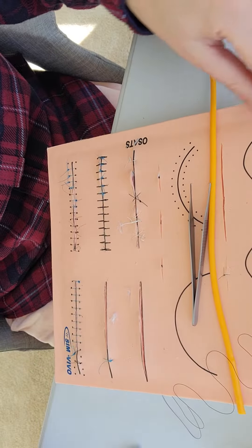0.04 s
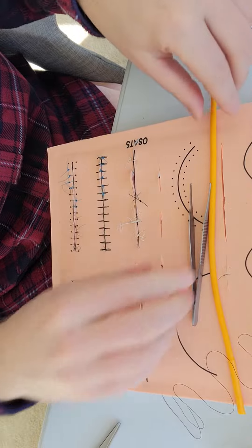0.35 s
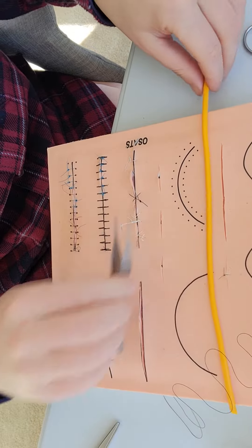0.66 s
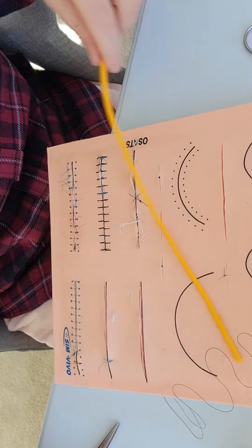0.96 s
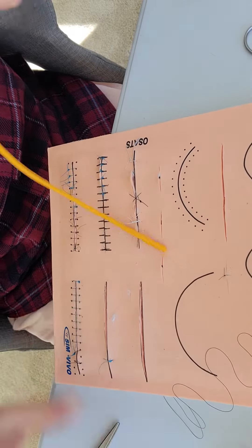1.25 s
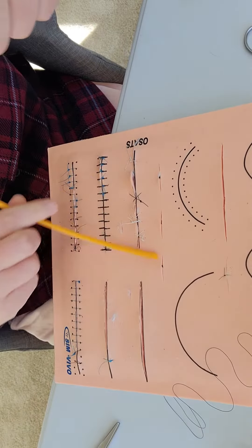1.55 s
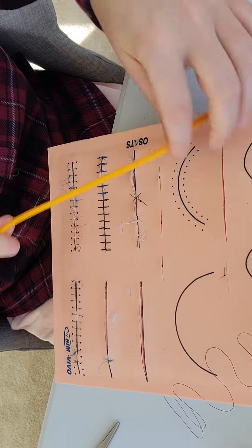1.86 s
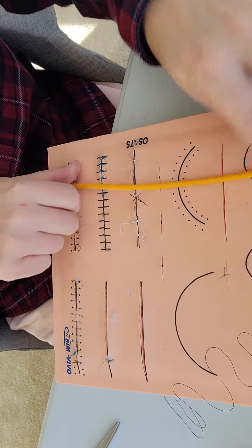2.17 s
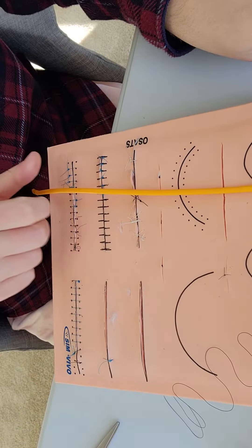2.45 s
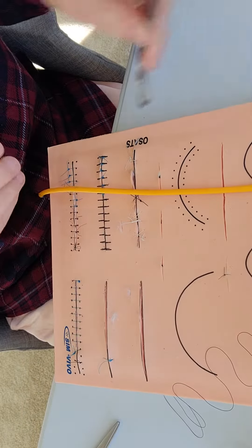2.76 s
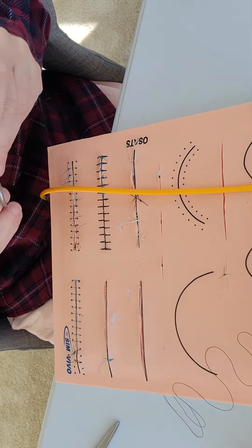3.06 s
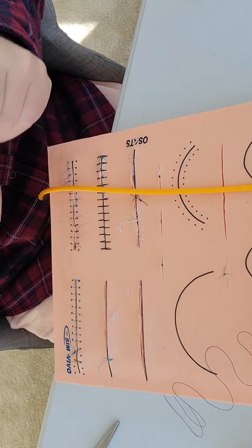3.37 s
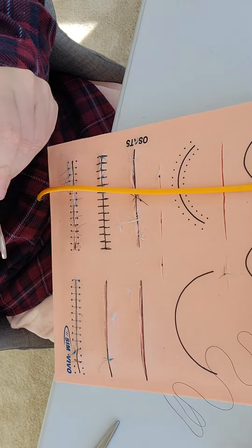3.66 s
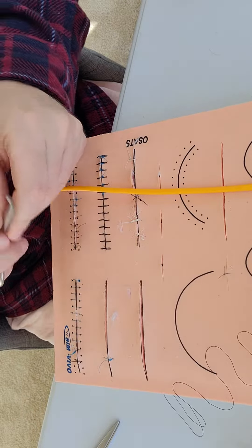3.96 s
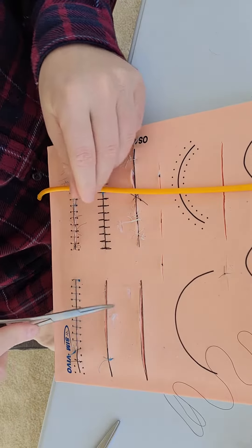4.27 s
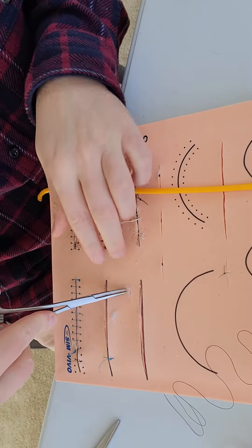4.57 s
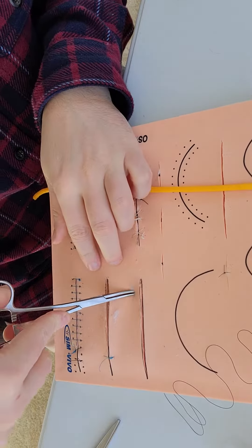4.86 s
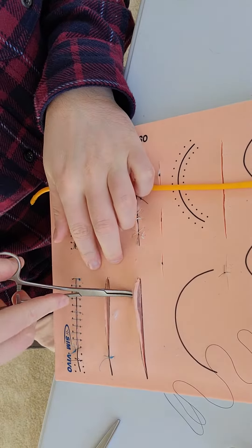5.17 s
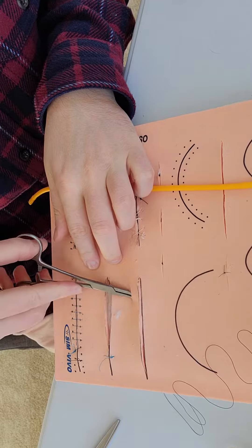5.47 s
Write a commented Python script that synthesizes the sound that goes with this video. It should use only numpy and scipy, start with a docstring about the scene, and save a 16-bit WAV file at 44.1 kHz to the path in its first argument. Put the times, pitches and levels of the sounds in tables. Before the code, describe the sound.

Steel instruments scrape and clatter on a plastic table, followed by faint metal ticks over quiet room noise.

```python
"""A small room, where steel suturing instruments are handled on a plastic folding table. Scissors slide and
clatter down, forceps leave the practice pad and drop, a needle holder is dragged and picked up. Each impact
excites the bending modes of the steel and of the table top; the harder the blow, the sharper its edge. Sliding
tools scrape by stick-slip friction. In between come soft bumps on the pad, a brushing sleeve and tiny ticks of
steel in the fingers, over quiet room noise."""
import sys
import numpy as np
from scipy import signal
from scipy.fft import rfft, irfft, next_fast_len
from scipy.io import wavfile

SR = 44100
rng = np.random.default_rng(int(sys.argv[2]) if len(sys.argv) > 2 else 0)


def store_pcm(level_fs):
    """Save levels as 16-bit WAV."""
    pcm = np.round(np.clip(level_fs, -1, 1) * 32767).astype(np.int16)
    wavfile.write(sys.argv[1], SR, np.atleast_2d(pcm).T)


N = 252252
RING_T = np.arange(SR * 3 // 5) / SR  # time axis of one contact, in seconds

# Impacts of steel on the table. Each row: start in seconds, instrument, clack level in dB,
# high bending boost in dB, knock level in dB, pitch of the struck spot in Hz.
BLOWS = [(-0.001, "scissors", -39, -2, -36.5, 330.4), (0.084, "scissors", -29, -2.5, -25.5, 937),
         (0.0969, "scissors", -38.5, -2, -44.5, 390), (0.1207, "scissors", -36, 10, -38, 690),
         (0.1286, "scissors", -51.5, 4, -30.5, 523), (1.04, "forceps", -40, -5, -31.5, 590),
         (1.0738, "forceps", -35, -4.5, -28.5, 483), (1.0761, "forceps", -38.5, 5.5, -32.5, 555),
         (1.2119, "forceps", -36, 2, -31.5, 481), (2.6206, "holder", -39, -4.5, -34.5, 503)]
# Character of each instrument. Each entry: low bending boost in dB, centre of the high bending in Hz,
# rattle in dB relative to the clack, thump in dB relative to a knock at 510 Hz.
INSTRUMENTS = {"scissors": (0, 5397.5, -1, -11), "forceps": (-11.5, 5049.5, -9.5, -22),
               "holder": (13, 4511, -1, -16)}
# Sliding strokes. Each row: start in seconds, length in seconds, steel level in dB,
# high bending boost in dB, table level in dB, slip rate in Hz.
DRAGS = [(-0.12, 0.43, -49.5, -1.5, -48, 200), (2.38, 0.081, -49, 3, -54, 948),
         (2.419, 0.049, -37.5, -3, -39.5, 741.8), (2.482, 0.08, -51.5, -4.5, -39.5, 383.4),
         (2.598, 0.052, -54, -5.5, -44, 401)]
# Hands and a rubber tube bump the pad. Each row: start in seconds, level in dB, pitch in Hz.
BUMPS = [(0.51, -64.5, 403), (0.584, -55.5, 600), (1.952, -59.5, 380), (2.164, -60, 620), (2.387, -61, 260)]
# Joints and finger rings touch in the hand. Each row: start in seconds, level in dB.
TICKS = [(0.4683, -70), (2.9229, -74), (3.4206, -81), (3.6109, -72), (3.6701, -74.5), (3.8492, -82),
         (4.2352, -60.5), (5.4965, -86)]

# Modes of free vibration. Each row: frequency in Hz, relative level in dB, 60 dB decay time in seconds.
STEEL_MODES = [(1986, -1, 0.077), (2194, -8.5, 0.076), (2756, 4.5, .13), (3060, 8, 0.16), (3510, 3, 0.15),
               (3920, -3.5, 0.2), (4450, -7.5, 0.11), (4715, -6.5, .1), (4940, -2.5, .12),
               (7480, -25, 0.148), (9250, -30.5, 0.2004)]  # instruments damped by table and fingers
TABLE_MODES = [(278.3, -8, 0.71), (319.4, -0.5, 0.29), (378.7, -3, .1), (550, 3, 0.13), (627, -5.5, 0.0692),
               (850, -10, 0.12), (915, -14, 0.098), (1129, 2, 0.1), (1309, -8.5, .09)]
HOLDER_MODES = [(5950, -2, 0.025), (7750, 0.5, 0.07), (8600, -18, .05), (15000, -22, 0.06)]  # needle holder in the hand
# Modes driven by noise. Each row: frequency in Hz, bandwidth in Hz, relative level in dB.
FORCEPS_MODES = [(1965, 70, -3), (2687, 70, -2), (3100, 70, -4.5), (3955, 94, -1), (4826, 65.3, -10.5),
                 (5400, 66, -5.5), (6250, 60, -8), (7490, 107.5, -10.5)]
DRONE_MODES = [(96, 13.61, -7.5), (139.5, 20, 2), (192, 7.9, -8), (228, 16.1, -8.5)]  # low modes of the room

# Spectra of contact pulses. Each row: frequency in Hz, relative spectral level in dB.
CLACK_SPECTRUM = [(300, -23), (1300, -3), (2100, -2), (2850, 6.5), (3500, 2), (4200, -2), (5000, -4.5),
                  (6000, -13), (7800, -20), (9500, -43.5), (16000, -62.5)]  # hard contact in the steel
EDGE_SPECTRUM = [(3000, -28), (7000, 6), (10000, -3.5), (12500, 1), (15500, -2.5)]  # its bright onset
KNOCK_SPECTRUM = [(80, -24), (200, -10.5), (290, 2), (500, -6), (700, -2.5), (900, -0.5), (1200, 1),
                  (1700, -8), (3000, -25.5), (8000, -62)]  # push on the table top
THUMP_SPECTRUM = [(25, -21.5), (70, -2.5), (130, 6.5), (270, -0.5), (450, -21.5), (1500, -50.5)]  # bass of a landing
TICK_SPECTRUM = [(500, 10.5), (1300, 10.5), (3000, -3.5), (4800, -1.5), (6300, 5.5), (7800, 1.5),
                 (10000, -23), (16000, -11)]  # light touch of steel on steel
SNAP_SPECTRUM = [(3000, -29.5), (7000, 4.5), (10000, -11), (13500, -14), (15000, 4.5), (15700, -4)]  # treble of a sharper touch
# Spectra of noises. Each row: frequency in Hz, relative spectral level in dB.
CLOTH_SPECTRUM = [(700, -24), (1300, -6.5), (2700, -0.5), (4000, 5.5), (6200, -2.5), (8200, -8.5),
                  (9200, -32.5), (15500, -25)]  # brushing sleeve
PAD_SPECTRUM = [(20, -4), (55, 3), (120, -2.5), (220, -19.5), (600, -22), (1500, -54.5)]  # hand's weight on the pad
AIR_SPECTRUM = [(20, -11.5), (58, -0.5), (78, -5.5), (98, 1.5), (170, -6), (300, -12.5), (500, -16),
                (850, -20), (1180, -16.5), (1700, -23), (2600, -32.5), (5000, -42), (7600, -44),
                (9200, -55.5), (13000, -46)]  # room noise

# Reverberation of the room. Each row: frequency in Hz, 60 dB decay time in seconds.
ROOM_DECAY = [(100, 0.43), (400, 0.25), (1200, 0.2), (3200, 0.28), (7000, 0.25), (14000, 0.061)]
# Where the hands work. Each row: time in seconds, lead of the left microphone in seconds.
HAND_PATH = [(0, -.0002), (1.3, -.00023), (2.3, .00022), (5.7, .00022)]


def blows(give_s=0.00057):
    """Impact: a landing instrument clacks and rattles, and the table top gives way a moment later."""
    out = np.zeros((2, N))
    for start, tool, clack_db, high_db, knock_db, spot_hz in BLOWS:
        low_db, high_hz, rattle_db, weight_db = INSTRUMENTS[tool]
        edge_db = -62.5 + 2.4 * (clack_db + 36)  # the edge grows faster than the clack
        edge_db += high_db - 0.4 * abs(low_db)  # and depends on how the steel bends
        thump_db = knock_db + weight_db - 17.5 * np.log2(spot_hz / 510)  # stiffer spots thump less
        clack = amp(clack_db) * steel_clack(low_db, high_db, high_hz, ring_db=-12)
        steel = clack + amp(rattle_db) * rattle(clack) + amp(edge_db) * click(EDGE_SPECTRUM)
        knock = amp(knock_db) * table_knock(spot_hz, q=5.7, ring_db=-6.5)
        thump = amp(thump_db) * click(THUMP_SPECTRUM)
        radiate(out, start, steel, room_db=-5, near_db=1.5)
        radiate(out, start + give_s, knock, room_db=-4, near_db=-7.5)
        radiate(out, start + give_s, thump, room_db=2, near_db=-3.5)
    return out


def steel_clack(low_db, high_db, high_hz, ring_db, low_hz=1950, width_octaves=0.45):
    """Modal excitation: the point of contact sets how strongly the low and high bending respond."""
    band = lambda f, hz: np.exp(-(np.log2((f + 1) / hz) / width_octaves) ** 2)
    bending = lambda f: low_db * band(f, low_hz) + high_db * band(f, high_hz)
    modes = [(hz, db + bending(hz), t60) for hz, db, t60 in STEEL_MODES]
    return unit_energy(click(CLACK_SPECTRUM, bending) + amp(ring_db) * ring(modes, scatter_db=4.5))


def rattle(clack, t60=0.062, scatter_db=7):
    """Repeated collision: the loose halves of an instrument buzz against each other and settle."""
    taps = rng.standard_normal(len(RING_T))
    taps *= amp(scatter_db * rng.standard_normal(len(RING_T)) - 60 * RING_T / t60)
    return signal.fftconvolve(clack, taps / np.linalg.norm(taps))[:len(clack)]


def table_knock(hz, q, ring_db, broadband=0.2):
    """Plate vibration: the struck spot yields at its own pitch and sets the whole top ringing."""
    spot = lambda f: broadband + resonance(f, hz, hz / q)
    push = unit_energy(filtered(click(KNOCK_SPECTRUM), spot))
    ringing = unit_energy(filtered(ring(TABLE_MODES, scatter_db=0), spot))
    return unit_energy(push + amp(ring_db) * ringing)


def drags(rise_share=0.43, hiss_gain=0.057, rumble_hz=240):
    """Sliding friction: slips in step with the top shake tool and table; roughness adds a rumble."""
    out = np.zeros((2, N))
    for start, length, steel_db, high_db, table_db, slip_hz in DRAGS:
        pressure = np.interp(RING_T / length, [0, rise_share, 1], [0, 1, 0])
        roughness = pressure * rng.standard_normal(len(RING_T))
        friction = pressure * slips(slip_hz) + hiss_gain * roughness
        low_db = -1.5 - 2.2 * high_db  # low bending trades against high
        steel = steel_clack(low_db, high_db, high_hz=4700, ring_db=-16.5)
        steel += amp(-34.5) * click(EDGE_SPECTRUM)
        table = table_knock(slip_hz, q=3.3, ring_db=-15)
        rumble = table_knock(rumble_hz, q=0.96, ring_db=-17.5, broadband=0.05)
        paths = [(friction, steel, steel_db), (friction, table, table_db),
                 (roughness, rumble, steel_db - 5)]
        for drive, body, db in paths:
            scrape = signal.fftconvolve(drive, body)[:len(RING_T)]
            scrape *= np.linalg.norm(pressure) / np.linalg.norm(scrape)
            radiate(out, start, amp(db) * scrape, room_db=-6.5, near_db=2)
    return out


def slips(hz, jitter=0.16, scatter_db=1.86, count=400):
    """Stick-slip motion: about hz releases a second, each a pulse, uneven in time and size."""
    times = np.cumsum(np.exp(jitter * rng.standard_normal(count))) / hz
    sizes = amp(scatter_db * rng.standard_normal(count))
    return np.bincount((times * SR).astype(int), sizes, len(RING_T))[:len(RING_T)]


def bumps(cutoff_hz=900):
    """Cushioning: the pad passes soft contacts to the table without their treble or their ring."""
    out = np.zeros((2, N))
    lowpass = lambda f: 1 / (1 + 1j * np.sqrt(2) * f / cutoff_hz - (f / cutoff_hz) ** 2) ** 2
    for start, db, hz in BUMPS:
        padded_spot = lambda f: (0.23 + resonance(f, hz, hz / 1.3)) * lowpass(f)
        bump = unit_energy(filtered(click(KNOCK_SPECTRUM), padded_spot))
        radiate(out, start, amp(db) * bump, room_db=-1, near_db=4)
    return out


def ticks():
    """Light impact: steel parts touch in the fingers and ring briefly; the sharper touches snap."""
    out = np.zeros((2, N))
    for start, db in TICKS:
        ping = ring(HOLDER_MODES, scatter_db=7)
        touch = amp(db) * (click(TICK_SPECTRUM) + amp(-6.5) * ping)
        snap_db = -64 + 1.49 * (db + 60.5)  # the snap grows faster than the tick
        radiate(out, start, touch + amp(snap_db) * click(SNAP_SPECTRUM), room_db=-5, near_db=1.5)
    return out


def sleeve_on_pad():
    """Friction noise: a sleeve brushes the pad, the forceps sing as they slide off, a hand presses."""
    brush = amp(-66.5) * swell(start_s=0.451, attack_s=0.043, hold_s=0.15, fall_db_per_s=79)
    press = amp(-55) * swell(start_s=0.485, attack_s=0.019, hold_s=0.06, fall_db_per_s=47)
    forceps = unit_rms(filtered(diffuse(N), lambda f: modal_response(f, FORCEPS_MODES)))
    rubbing = amp(-1.5) * shaped_noise(CLOTH_SPECTRUM) + amp(-0.5) * forceps
    return brush * rubbing + press * shaped_noise(PAD_SPECTRUM)


def room_noise(air_db=-64, drone_db=-73, swell_db=-61, cutoff_hz=400):
    """Standing waves: under steady air noise the room's low modes drone, swelling near the end."""
    growth = amp(swell_db) * swell(start_s=4.41, attack_s=0.43, hold_s=0.15, fall_db_per_s=6)
    low_modes = lambda f: modal_response(f, DRONE_MODES) / (1 + (f / cutoff_hz) ** 4)
    air = amp(air_db) * shaped_noise(AIR_SPECTRUM)
    drone = unit_rms(filtered(diffuse(N), low_modes))
    return air + np.hypot(amp(drone_db), growth) * drone


def radiate(out, start, sound, room_db, near_db, near_t60=0.019, wall_onset_s=0.00088):
    """Propagation: adds a sound to out, nearer microphone first, with echoes of objects and walls."""
    margin, n = SR // 1000, len(RING_T)  # the margin leaves room for the earlier arrival
    sound = np.pad(sound, (margin, 0))
    lead = np.interp(start, *np.transpose(HAND_PATH)) * np.array([[1], [-1]])
    direct = filtered(sound, lambda f: np.exp(1j * np.pi * f * lead))
    near = diffuse(n) * amp(-60 * RING_T / near_t60)  # things on the table
    hz, t, bands = signal.stft(diffuse(n), SR, nperseg=256)
    bands = bands * amp(-60 * t / along(ROOM_DECAY, hz)[:, None])
    walls = signal.istft(bands, SR, nperseg=256)[1][:, :n]
    walls *= 1 - np.exp(-(RING_T / wall_onset_s) ** 2)
    echoes = sum(amp(db) * tail / np.sqrt(np.sum(tail ** 2) / 2)
                 for tail, db in [(near, near_db), (walls, room_db)])
    heard = direct + signal.fftconvolve(sound[None], echoes, axes=1)[:, :len(sound)]
    first = round(start * SR) - margin
    out[:, max(first, 0):first + len(sound)] += heard[:, max(-first, 0):N - first]


def click(spectrum, boost=lambda f: 0, size=4096):
    """Minimum phase: the shortest causal pulse with the given spectrum, lifted by boost(f) dB."""
    f = np.fft.rfftfreq(size, 1 / SR)
    cepstrum = irfft(np.log(amp(along(spectrum, f) + boost(f))))
    cepstrum[1:size // 2] *= 2
    cepstrum[size // 2 + 1:] = 0
    pulse = irfft(np.exp(rfft(cepstrum)))
    return unit_energy(np.pad(pulse, (0, len(RING_T) - size)))


def ring(modes, scatter_db):
    """Free vibration: exponentially decaying modes, random in phase and scattered in strength."""
    hz, db, t60 = np.transpose(modes)[:, :, None]
    db = db + scatter_db * rng.standard_normal(hz.shape)
    phase = 2 * np.pi * rng.random(hz.shape)
    partials = amp(db - 60 * RING_T / t60) * np.sin(2 * np.pi * hz * RING_T + phase)
    return unit_energy(partials.sum(axis=0))


def resonance(f, hz, width):
    """Forced vibration: the response of one damped mode."""
    return 1j * f * width / (hz * hz - f * f + 1j * f * width)


def modal_response(f, modes):
    """Modal superposition: a body responds as the sum of its resonances."""
    return sum(amp(db) * resonance(f, hz, width) for hz, width, db in modes)


def diffuse(n, spacing_m=0.162, max_coherence=0.96, sound_m_per_s=343):
    """Diffuse field: white noise from all sides, coherent at two microphones only in the bass."""
    coherence = lambda f: max_coherence * np.sinc(2 * f * spacing_m / sound_m_per_s)
    weights = lambda f: np.sqrt([1 + coherence(f), 1 - coherence(f)])
    mid, side = filtered(rng.standard_normal((2, n)), weights)
    return unit_rms(np.array([mid + side, mid - side]))


def shaped_noise(spectrum):
    """Spectral shaping: diffuse noise of rms 1 with the given spectrum."""
    return unit_rms(filtered(diffuse(N), lambda f: amp(along(spectrum, f))))


def swell(start_s, attack_s, hold_s, fall_db_per_s):
    """Envelope: a linear rise to 1, a hold and an exponential decay."""
    t = np.arange(N) / SR - start_s
    return np.clip(t / attack_s, 0, 1) * amp(-fall_db_per_s * np.maximum(t - attack_s - hold_s, 0))


def filtered(x, response):
    """Linear filtering: the spectrum of x times a frequency response."""
    n = x.shape[-1]
    size = next_fast_len(n + SR // 10)
    return irfft(rfft(x, size) * response(np.fft.rfftfreq(size, 1 / SR)), size)[..., :n]


def along(points, hz):
    """Interpolation of (Hz, value) points on a logarithmic frequency axis."""
    f, values = np.transpose(points)
    return np.interp(np.log(hz + 1), np.log(f), values)


def amp(db):
    """Decibels as an amplitude ratio."""
    return 10 ** (np.asarray(db) / 20)


def unit_rms(x):
    """Normalisation to rms 1."""
    return x / np.sqrt(np.mean(x ** 2) + 1e-20)


def unit_energy(x):
    """Normalisation of a transient to the energy of 10 ms at rms 1."""
    return x / np.sqrt(np.sum(x ** 2) / (SR / 100) + 1e-20)


def scene():
    """Superposition at two microphones; sleeve, pad and room noise are a little stronger on the right."""
    contacts = blows() + drags() + bumps() + ticks()
    return contacts + (sleeve_on_pad() + room_noise()) * amp([[-0.8], [0.8]])


def record(dry, top_hz=15750):
    """Band limiting: the phone passes nothing above top_hz."""
    return filtered(dry, lambda f: f < top_hz)


dry = scene()
out = record(dry)
store_pcm(out)
```